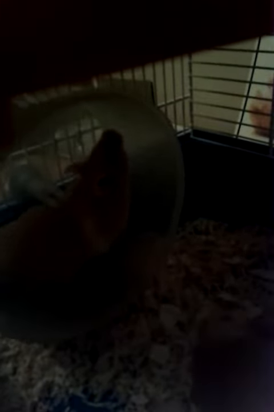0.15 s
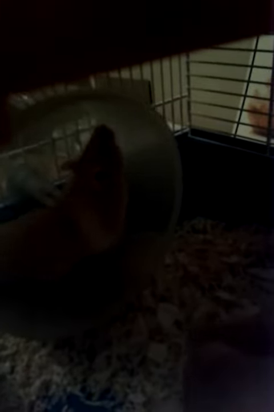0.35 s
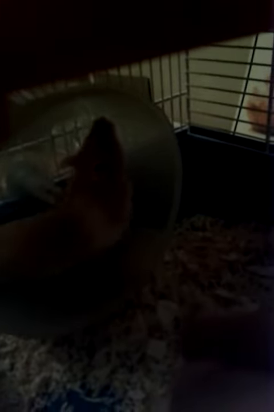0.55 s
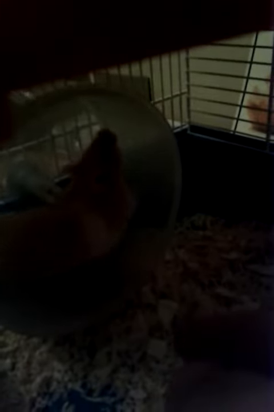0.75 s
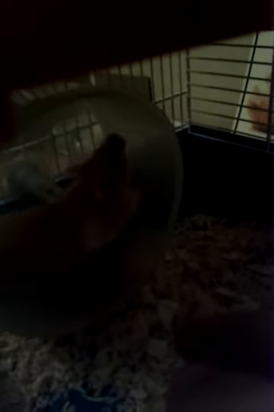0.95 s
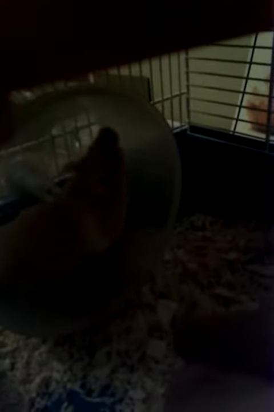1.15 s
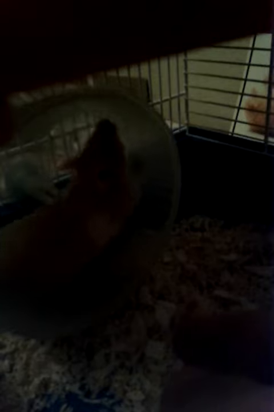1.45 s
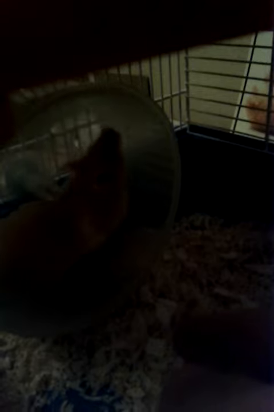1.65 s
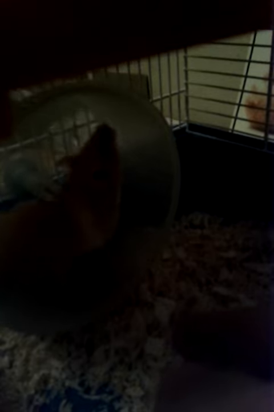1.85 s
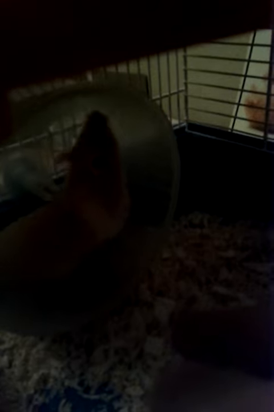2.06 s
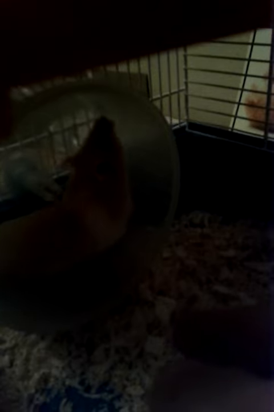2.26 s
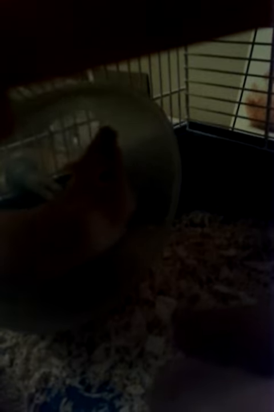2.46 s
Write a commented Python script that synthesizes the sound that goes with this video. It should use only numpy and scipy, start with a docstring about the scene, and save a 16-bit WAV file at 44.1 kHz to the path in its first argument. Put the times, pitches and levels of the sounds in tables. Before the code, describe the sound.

Hollow plastic wheel clatter, uneven knocks and tiny claw ticks, close up in a quiet room

```python
"""Quiet room, phone close to a wire cage: a small rodent works at a loose plastic wheel.
Knocks are damped modes of wheel and stand; after each the wheel rattles (random soft bumps) and scuffs.
Claw ticks are noise cracks plus wire modes, over a faint patter of the same modes.
One thin squeak is a wavering sine; the room adds soft coloured hiss and a short diffuse tail."""
import sys
import numpy as np
from scipy import signal
from scipy.fft import rfft, irfft
from scipy.io import wavfile
from scipy.ndimage import uniform_filter1d, map_coordinates

SR = 44100
rng = np.random.default_rng(int(sys.argv[2]) if len(sys.argv) > 2 else 0)


def output_pcm(signal):
    """Save a mono or channel-first signal as 16-bit PCM at the path in sys.argv[1].

    Samples are clipped to [-1, 1] before scaling.
    """
    pcm = np.clip(np.atleast_2d(signal).T, -1, 1) * 32767
    wavfile.write(sys.argv[1], SR, np.round(pcm).astype(np.int16))


def to_linear_factor(level_db):
    """Convert decibel levels (scalar or array-like) to linear amplitude factors."""
    exponent = np.asarray(level_db, float) / 20
    return 10 ** exponent


N = 114660


def band(x, lo_hz, hi_hz):
    """Butterworth band-pass."""
    return signal.sosfilt(signal.butter(2, [lo_hz, hi_hz], "bandpass", fs=SR, output="sos"), x)


def level(x, db):
    """Scale to an rms level."""
    return x * to_linear_factor(db) / np.sqrt(np.mean(x ** 2))


def walk(rate_hz):
    """Random levels of about unit spread, held 1 / rate_hz s and slewed twice."""
    hold = int(SR / rate_hz)
    steps = np.repeat(rng.standard_normal(N // hold + 1), hold)
    return 1.703 * uniform_filter1d(uniform_filter1d(steps, hold), hold)[:N]


def ring(times_s, gains, modes):
    """Each blow sets every mode ringing; times and complex gains are blows x modes."""
    out = np.zeros(N)
    at = np.clip((times_s * SR).astype(int), 0, N - 1)
    for k, (hz, db, t60_s) in enumerate(modes):
        push = np.zeros(N, complex)
        np.add.at(push, at[:, k], gains[:, k] * to_linear_factor(db))
        pole = np.exp((2j * np.pi * hz - np.log(1000) / max(t60_s, 0.005)) / SR)  # t60 at least 5 ms
        out += signal.lfilter([1], [1, -pole], push).imag
    return out


LOUDEST_DB = 21  # cap on a random blow over the weakest


def swarm(per_s, spread_db):
    """Random small blows: times and sizes, exponential in dB, so most are weak."""
    chance = rng.random((int(per_s * N / SR), 2))
    size_db = np.minimum(-spread_db * np.log(1 - chance[:, 1]), LOUDEST_DB)
    return chance[:, 0] * N / SR, to_linear_factor(size_db)


HISS_DB, FLICKER_DB = -48.5, 0.5  # flicker is scaled per octave band
# room hiss spectrum, relative: [f/Hz, density/dB per Hz]
HISS_SPECTRUM = [(18, -63), (30, -39), (75, -10), (213, -20), (294, 7.5), (783, -15.5), (878, -2),
                 (1210, -18.5), (1420, -1), (1700, -1.5), (1860, -12), (3370, -16.5), (7000, -18.5),
                 (9100, -63.5), (15400, -120)]


def hiss():
    """Coloured room noise whose octave bands flicker on their own, the treble least."""
    hz = np.maximum(np.arange(N // 2 + 1) * SR / N, 1)
    table_hz, table_db = np.array(HISS_SPECTRUM).T
    spectrum = rfft(rng.standard_normal(N)) * to_linear_factor(np.interp(np.log(hz), np.log(table_hz), table_db))
    octave = np.clip(np.log2(hz / 80).astype(int), 0, 6)
    out = np.zeros(N)
    for k in range(7):
        flicker = to_linear_factor(FLICKER_DB * (2.5 - k / 8) * walk(16))
        out += irfft(spectrum * (octave == k), N) * flicker
    return level(out, HISS_DB)


TAIL_DB, TAIL_T60_LOW_S, TAIL_T60_HIGH_S = -8, 0.16, 0.17


def tail(x):
    """Cage tray and room answer with a short diffuse tail: two noise bands decaying exponentially."""
    t = np.arange(SR // 3) / SR
    noise = rng.standard_normal(len(t)) * np.clip(t / 0.0057, 0, 1)  # 5.7 ms build-up
    low = band(noise, 110, 640) * to_linear_factor(-60 * t / TAIL_T60_LOW_S)
    high = band(noise, 1100, 4000) * to_linear_factor(-60 * t / TAIL_T60_HIGH_S)
    # energy shares: 1/20 low, 1/3 high
    answer = low / np.sqrt(np.sum(low ** 2) * 20) + high / np.sqrt(np.sum(high ** 2) * 3)
    return to_linear_factor(TAIL_DB) * signal.fftconvolve(x, answer)[:N]


PATTER_PER_S, PATTER_DB, PATTER_SPREAD_DB = 460, -59, 3.5
# wire modes, also rung by the claw ticks: [f/Hz, level/dB, t60/s]
WIRE_MODES = [(2094, -6.5, 0.012), (2310, -9, 0.012), (2867, -15, 0.017), (3140, -11.5, 0.016),
              (3453, -10.5, 0.016), (3747, -8.5, 0.01), (4494, -9, 0.0034), (6350, -19.5, 0.0023)]


def patter():
    """Faint dense ticks in the wires: random blows ring the wire modes."""
    s, size = swarm(PATTER_PER_S, PATTER_SPREAD_DB)
    chance = rng.standard_normal((len(s), len(WIRE_MODES)))
    return level(ring(s[:, None] + 0 * chance, size[:, None] * chance + 0j, WIRE_MODES), PATTER_DB)


SQUEAK_WAVER_HZ, SQUEAK_WAVER_DB = 35, 2.5
# squeak track: [t/s, f/Hz, rms level/dB]
SQUEAK_TRACK = [(1.4, 6220, -68), (1.45, 5790, -67), (1.565, 5820, -71)]


def squeak():
    """One thin sine whistle that falls, then holds, wavering in level and pitch."""
    s, hz, db = np.array(SQUEAK_TRACK).T
    t = np.arange(N) / SR
    gate = np.clip(np.minimum(t - s[0], s[-1] - t) / 0.01, 0, 1)  # 10 ms fades
    loudness = to_linear_factor(np.interp(t, s, db) + SQUEAK_WAVER_DB * walk(79))
    pitch_hz = np.interp(t, s, hz) + SQUEAK_WAVER_HZ * walk(200)
    return np.sqrt(2) * gate * loudness * np.sin(2 * np.pi * np.cumsum(pitch_hz) / SR)


TICK_LEAD_S, CRACK_RISE_S, CRACK_DECAY_S = 0.0003, 0.0012, 0.0032
CRACK_DB, WIRE_DB, WIRE_SCATTER_DB = -3, -5, 2  # offsets on the table level
# claw ticks: [t/s, level/dB before offsets, tilt/dB per octave]
CLAW_TICKS = [(0.1871, -35, -1), (0.2235, -30.5, 2), (0.2648, -34, -11.5), (0.35, -37, 13),
              (0.3896, -38.5, 12), (0.416, -27.5, 12.5), (0.4708, -33.5, -0.5), (0.5048, -37.5, 11),
              (0.5838, -43.5, 6), (0.659, -35, -0.5), (0.6884, -31, -4), (0.8196, -29.5, -6),
              (0.897, -37.5, 4), (0.9118, -42, -1.5), (0.9246, -34, 1), (0.9514, -36, -5.5),
              (1.0097, -15, -7.5), (1.08, -30.5, 2.5), (1.124, -34, -11), (1.266, -20, -7),
              (1.4662, -41, -1), (1.5524, -34, -16), (1.579, -35, -4), (1.6577, -32, -6),
              (1.6913, -27.5, -2.5), (1.8216, -36, -3), (1.948, -35.5, -14), (1.9856, -39.5, -9.5),
              (2.0109, -19, -3.5), (2.0681, -18, -5.5), (2.116, -28.5, -4.5), (2.234, -31.5, -6),
              (2.288, -37.5, -11), (2.363, -38.5, -11), (2.414, -38.5, -9), (2.5172, -38, -2)]


def ticks():
    """A short crack of noise, bright or dull, and a brief ring of the wires."""
    out, t = np.zeros(N + 2048), np.arange(2048) / SR
    hz = np.maximum(np.arange(1025) * SR / 2048, 800)
    top_loss = 1 + (hz / 6000) ** 4
    envelope = np.exp(-t / CRACK_DECAY_S) * (1 - np.exp(-t / CRACK_RISE_S))
    for s, db, tilt_db in CLAW_TICKS:
        colour = to_linear_factor(tilt_db * np.log2(hz / 3500)) * (hz > 800) / top_loss
        crack = irfft(rfft(rng.standard_normal(2048)) * colour)
        i = int((s - TICK_LEAD_S) * SR)
        out[i:i + 2048] += level(crack, db + CRACK_DB) * envelope
    s, db = np.array(CLAW_TICKS).T[:2, :, None]
    chance = rng.standard_normal((len(s), len(WIRE_MODES)))
    gains = to_linear_factor(db + WIRE_DB + WIRE_SCATTER_DB * chance) + 0j
    return out[:N] + ring(s - TICK_LEAD_S + 0 * chance, gains, WIRE_MODES)


SHAKE_RISE_S, SETTLE_S = 0.0044, 0.056


def shaking():
    """Each knock shakes the wheel up in proportion; it settles again."""
    shaken = np.zeros(N)
    for s, db, *_ in KNOCK_LIST:
        since = np.maximum(np.arange(N) / SR - s, 0)
        shaken += to_linear_factor(db) * (1 - np.exp(-since / SHAKE_RISE_S)) * np.exp(-since / SETTLE_S)
    return shaken


SCUFF_DB, SCUFF_LO_HZ, SCUFF_HI_HZ = -40, 700, 2920  # rms at shaking = 1


def scuff(shaken):
    """The shaking rim rubs on its stand: grainy mid-band noise."""
    grain = to_linear_factor(2.6 * walk(150)) * band(rng.standard_normal(N), SCUFF_LO_HZ, SCUFF_HI_HZ)
    return level(grain, SCUFF_DB) * shaken


RATTLE_PER_S, RATTLE_SPREAD_DB, RATTLE_TILT_DB_PER_OCT = 400, 1.9, -4
RATTLE_REST_DB, RATTLE_SHAKEN_DB = -48, -24.5  # rms at rest; rms added at shaking = 1
RATTLE_RING = 0.6  # share of the free t60 left while the wheel rubs
WOBBLE_S = 0.004  # time wobble as the wheel turns
SOFT_HZ = 1860  # bumps too soft to click above this
# wheel and stand modes, also rung by the knocks: [f/Hz, level/dB, t60/s]
WHEEL_MODES = [(51.4, -14.5, 0.066), (98.2, -19.5, 0.15), (177, -13, 0.2), (221, -11, 0.16),
               (264, -4.5, 0.092), (315.6, -8, 0.3), (386.8, -9, 0.15), (427, 1, 0.115), (554.8, -6, 0.13),
               (635.7, -6, 0.079), (746, -13.5, 0.11), (912, -6.5, 0.1), (1126, -21, 0.27),
               (1457, -3.5, 0.046), (1625, -12.5, 0.1), (2215, -18, 0.03)]


def rattle(shaken):
    """Dense soft bumps in the wheel modes, louder while the wheel shakes."""
    s, size = swarm(RATTLE_PER_S, RATTLE_SPREAD_DB)
    hz = np.array(WHEEL_MODES)[:, 0]
    phase = np.exp(2j * np.pi * rng.random((len(s), len(hz))))
    gains = size[:, None] * to_linear_factor(RATTLE_TILT_DB_PER_OCT * np.log2(hz / 430)) * phase
    bumps = ring(s[:, None] + 0 * hz, gains, np.array(WHEEL_MODES) * [1, 1, RATTLE_RING])
    wobbled = np.arange(N) + WOBBLE_S * SR * walk(8)
    bumps = map_coordinates(bumps, [wobbled], order=1, mode="mirror")
    return level(band(bumps, 65, SOFT_HZ), 0) * (to_linear_factor(RATTLE_REST_DB) + to_linear_factor(RATTLE_SHAKEN_DB) * shaken)


LOW_HZ, LOW_RISE_CYCLES, RISE_CYCLES = 300, 2.4, 1.5
KNOCK_DB, KNOCK_LEAD_S = -5, 0.001954  # level offset; start ahead of the table time
SCATTER_DB, DETUNE = 1.5, 0.02  # per mode and knock; detune as a fraction of f
DAMPED_DB, DAMP_S = -12, 0.003
# wheel knocks: [t/s, level/dB before offset, tilt/dB per octave, gain of modes below LOW_HZ/dB, free ring/s]
KNOCK_LIST = [(0.11, -29, -1.5, -3, 0.013), (0.124, -32, -1.5, 8, 0.026), (0.139, -30, -5.5, 0, 0.021),
              (0.156, -32, -13, 4, 0.036), (0.239, -30, -0.5, 10, 0.023), (0.266, -30.5, -0.5, 11, 0.019),
              (0.278, -37, 1, 6, 0.0096), (0.299, -49, -1, 5, 0.012), (0.425, -27.5, -1.5, -2, 0.016),
              (0.438, -24, -12.5, 3, 0.016), (0.478, -26, -4, 5.5, 0.024), (0.519, -24.5, -9, 7.5, 0.022),
              (0.661, -17.5, -5, 5, 0.025), (0.689, -20, -7.5, 4.5, 0.015),
              (0.703, -25.5, -19, -1.5, 0.015), (0.759, -17.5, -12.5, 3.5, 0.0074),
              (0.869, -24, -11.5, 3.5, 0.016), (0.977, -27, -13, 8.5, 0.011), (1.011, -10.5, -4, -3, 0.015),
              (1.043, -20.5, -2.5, 5.5, 0.0057), (1.085, -17, -3, 2, 0.0061),
              (1.126, -18.5, -4.5, 3, 0.013), (1.135, -35.5, -4, 7.5, 0.0097), (1.191, -29, -8, 6.5, 0.021),
              (1.247, -20.5, -5, -9, 0.013), (1.269, -13.5, -3, 2, 0.017),
              (1.312, -24.5, -5.5, 10.5, 0.034), (1.335, -28, -15, 3, 0.021), (1.362, -29, -24, 10, 0.014),
              (1.486, -24.5, -7.5, 3.5, 0.021), (1.552, -24, -3.5, 1.5, 0.029),
              (1.655, -25, -6.5, 5, 0.015), (1.715, -24, -4.5, 7.5, 0.019), (1.737, -24.5, -1.5, 6, 0.016),
              (1.941, -32, -8, -1, 0.0079), (1.989, -21.5, -8, -4.5, 0.032), (2.011, -11, -5, -1.5, 0.014),
              (2.038, -16, -7.5, 5, 0.013), (2.055, -21, 1, 2, 0.019), (2.072, -8, -3.5, -1.5, 0.01),
              (2.084, -24.5, -2.5, -7, 0.0087), (2.104, -25.5, -5, 6.5, 0.016), (2.116, -19, -3, 3, 0.019),
              (2.159, -32, -7, 11.5, 0.015), (2.236, -15, -4.5, -3.5, 0.016), (2.306, -30, -5, 0, 0.012),
              (2.368, -20.5, -11, 7.5, 0.0083), (2.423, -24, -7, 7, 0.012), (2.462, -34, 0, 10, 0.0067)]


def knocks():
    """Modes swell and ring freely; the wheel settles on its axle and damps them, the lowest half as much in dB."""
    out, t = np.zeros(N + 8192), np.arange(8192) / SR
    hz, mode_db, t60_s = np.array(WHEEL_MODES).T[:, :, None]
    low = hz < LOW_HZ
    swell = 1 - np.exp(-t * hz / np.where(low, LOW_RISE_CYCLES, RISE_CYCLES))
    shape = swell * to_linear_factor(-60 * t / np.maximum(t60_s, 0.005))
    octaves = np.log2(np.maximum(hz / 430, 1))
    for s, db, tilt_db, low_db, free_s in KNOCK_LIST:
        scatter, detune = rng.standard_normal((2, *hz.shape))
        phase = 2 * np.pi * rng.random(hz.shape)
        gain = to_linear_factor(db + KNOCK_DB + mode_db + tilt_db * octaves + low * low_db + SCATTER_DB * scatter)
        sound = gain * shape * np.cos(2 * np.pi * hz * (1 + DETUNE * detune) * t + phase)
        settle = to_linear_factor(DAMPED_DB * (1 + np.tanh((t - free_s) / DAMP_S)) / 2)
        low_sum = sound[low[:, 0]].sum(axis=0)
        high_sum = sound[~low[:, 0]].sum(axis=0)
        i = int((s - KNOCK_LEAD_S) * SR)
        out[i:i + 8192] += np.sqrt(settle) * low_sum + settle * high_sum
    return out[:N]


def scene():
    """Knocks and ticks with their tail, over rattle, scuff, patter, squeak and hiss."""
    hits, shaken = knocks() + ticks(), shaking()
    wheel = rattle(shaken) + scuff(shaken)
    return (hits + tail(hits) + wheel + patter() + squeak() + hiss())[None]


def low_pass(x):
    """Removes everything above the highest recorded frequency."""
    return signal.sosfilt(signal.butter(12, 7680, fs=SR, output="sos"), x)


MIC_LOW_HZ, TOP_HZ = 182, 6796


def record(dry):
    """The phone thins the bass and cuts the top steeply."""
    thin = signal.sosfilt(signal.butter(1, MIC_LOW_HZ, "highpass", fs=SR, output="sos"), dry)
    mix = signal.sosfilt(signal.ellip(12, 0.3, 95, TOP_HZ, fs=SR, output="sos"), thin)
    return low_pass(mix)


dry = scene()
out = record(dry)
output_pcm(out)
```